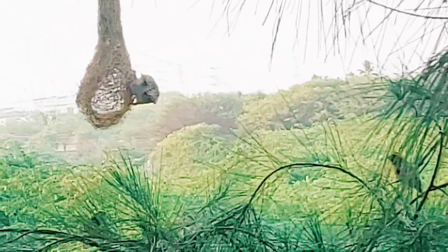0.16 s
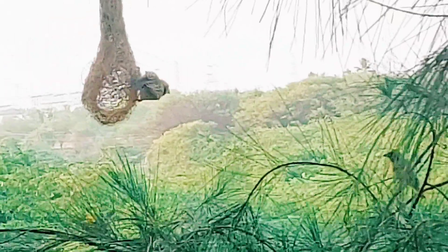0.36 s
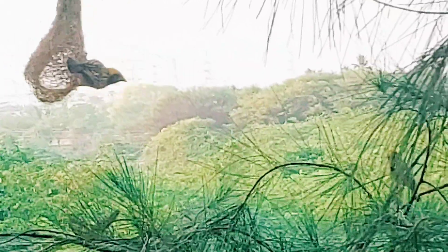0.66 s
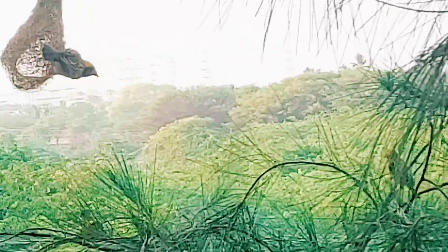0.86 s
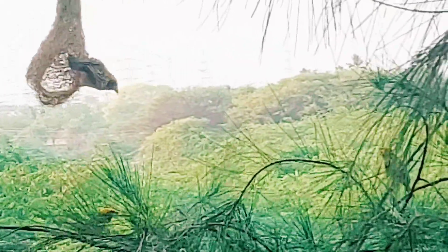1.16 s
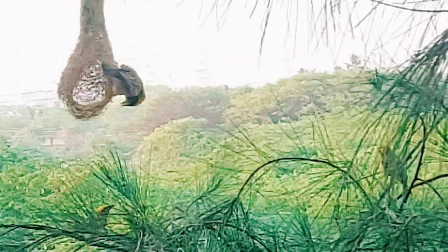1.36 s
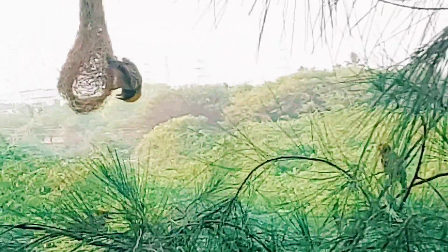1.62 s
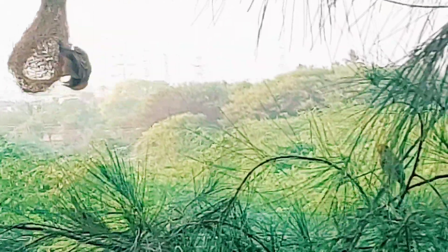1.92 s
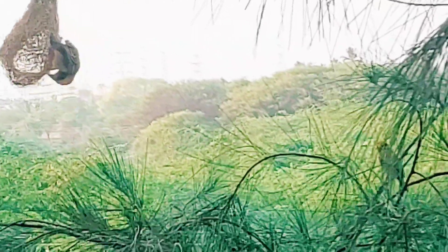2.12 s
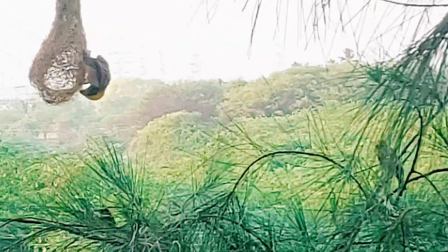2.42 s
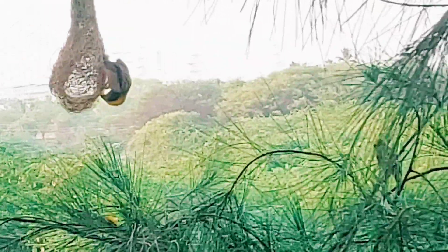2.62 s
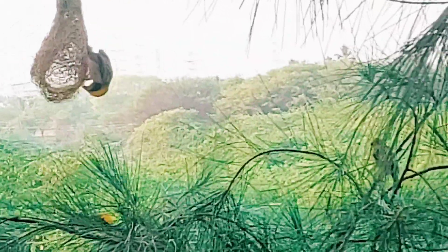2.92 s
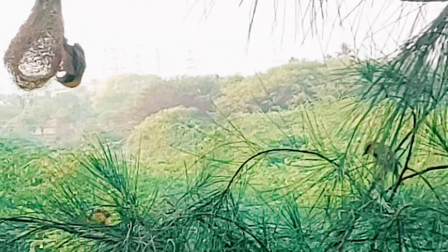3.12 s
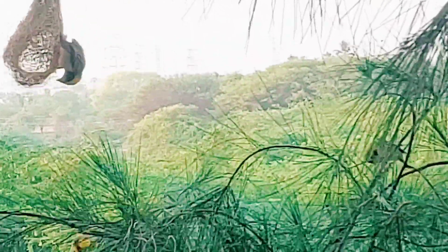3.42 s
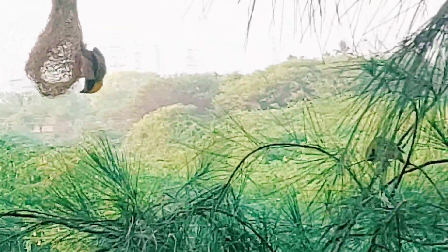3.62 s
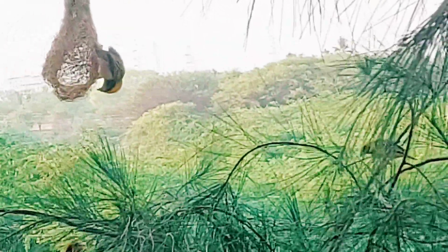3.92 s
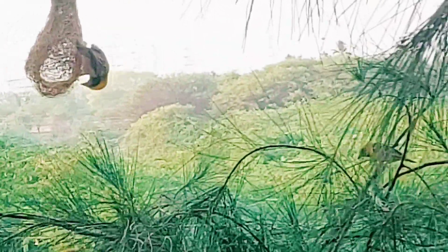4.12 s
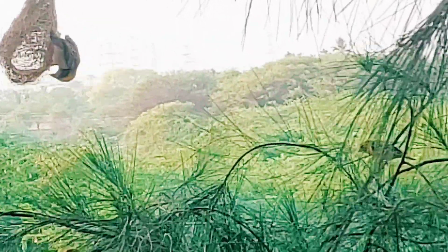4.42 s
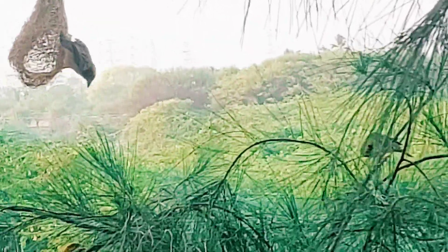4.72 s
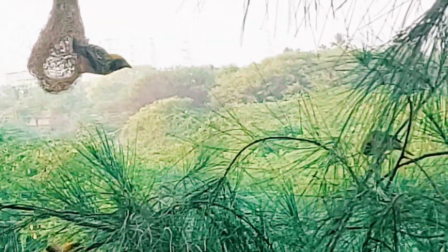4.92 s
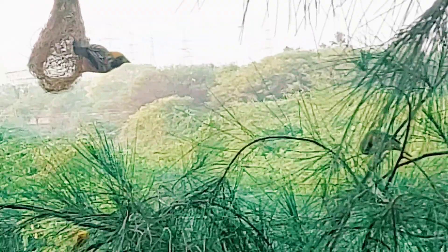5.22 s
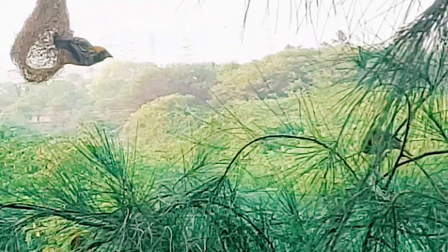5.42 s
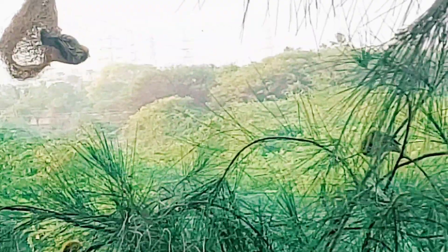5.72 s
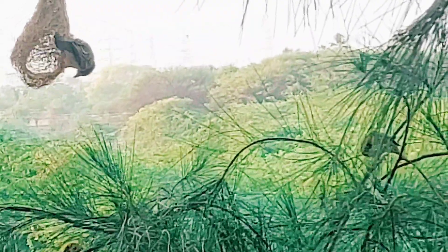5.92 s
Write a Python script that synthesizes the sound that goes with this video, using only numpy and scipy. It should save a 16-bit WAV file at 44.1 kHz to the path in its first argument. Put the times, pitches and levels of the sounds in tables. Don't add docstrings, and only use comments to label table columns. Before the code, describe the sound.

Close weaver birds at a hanging nest chatter in bright, piercing bursts: sliding whistles, rasps and see-saw warbles, then rapid churrs. A long nasal wheeze buzzes through the second and third seconds. A sparser lull follows with brief chirps, then strong churrs and warbles return. More of the flock twitters behind. Leaves give a short soft echo; far traffic and wind rumble low. The handheld phone microphone is slightly overloaded.

```python
import sys
import numpy as np
from scipy import signal
from scipy.fft import rfft, irfft
from scipy.io import wavfile
from scipy.ndimage import uniform_filter1d, map_coordinates

SR = 44100
rng = np.random.default_rng(int(sys.argv[2]) if len(sys.argv) > 2 else 0)


def makeup_ratio(level_db):
    decades = np.asarray(level_db, float) / 20
    return 10 ** decades


def digitize_waveform(pressure):
    field = np.atleast_2d(pressure).T
    bounded = np.clip(field, -1, 1)
    quanta = np.round(bounded * 32767).astype(np.int16)
    wavfile.write(sys.argv[1], SR, quanta)


N = 267246


def sing(put, start, hz, gain, pan_db, lead_ms, rough=.3, waver=0.01006, second_db=-28, third_db=-24):
    n = len(hz)
    right_phase = 2 * np.pi * np.cumsum(hz * (1 + waver * wobble(n, 252.8))) / SR
    left_phase = right_phase + 2 * np.pi * hz * lead_ms / 1000
    gain = gain * (1 + rough * wobble(n, 303.8))

    def tone(phase):
        return np.sin(phase) + makeup_ratio(second_db) * np.sin(2 * phase) + makeup_ratio(third_db) * np.sin(3 * phase)

    put(start, gain * makeup_ratio(pan_db) * tone(left_phase), gain * tone(right_phase))


def wobble(count, hz):
    place = np.arange(count) * hz / SR
    i = place.astype(int)
    knots = rng.standard_normal(i[-1] + 2)
    ease = np.sin(np.pi / 2 * (place - i)) ** 2
    return 1.15 * (knots[i] + ease * (knots[i + 1] - knots[i]))


def follow(table, stretch):
    s, *columns = np.transpose(table)
    t = np.arange(s[0], s[-1], 1 / SR / stretch)
    return [uniform_filter1d(np.interp(t, s, column), size=160) for column in columns]


def fade(count, edge_s):
    i = np.arange(count)
    return np.sin(np.pi / 2 * np.clip(np.minimum(i, count - i) / (edge_s * SR), 0, 1)) ** 2


def add(out, start, left, right):
    i = max(int(start * SR), 0)
    n = max(min(len(left), N - i), 0)
    out[:, i:i + n] += np.array([left[:n], right[:n]])


# t/s, lead/ms
LEAD_MS = [(0, .21), (4.15, .21), (4.19, .25), (4.24, .07), (4.4, .07), (4.45, .1), (5.7, .1), (5.72, 0)]


def lead(s):
    return np.interp(s, *np.transpose(LEAD_MS))


# t/s, f/Hz, level/dB
WARBLE = [(-.029, 3650, -17), (0, 5800, 0), (.027, 3900, 0), (.039, 3830, 1), (.0505, 5650, 1),
          (.063, 3560, -5), (.074, 3620, -5), (.0845, 5580, 1), (.101, 2900, -12)]
# t/s, f/Hz, level/dB
WARBLE_TOP = [(-.034, 4800, -16), (-.014, 6257, -8.5), (.002, 6136, -5), (.022, 5287, -10.5),
              (.036, 5236, -20), (.056, 5400, -5.5), (.1, 5405, -12), (.14, 5430, -33)]
# t/s, level/dB, depth of the pitch dips [ratio], left minus right/dB
WARBLES = [(.686, -19, 0.95, -6.5), (1.764, -16.5, 1.05, -4), (2.262, -19, .85, -2),
           (2.686, -15.5, 1.1, -3), (3.83, -19, 1.07, -2), (4.1, -15.5, 0.99, -4), (4.5, -17, 1.01, 0),
           (4.873, -15.5, 1.02, -3), (5.087, -14.5, 0.97, -4.5), (5.293, -18.5, 0.98, -2.5),
           (5.501, -15.5, 1.06, -5.5)]


def warbles(put):
    crest_hz, lead_ms = 5700, .2
    for s, db, depth, pan_db in WARBLES:
        for shape, deep, rough in ((WARBLE, depth, .22), (WARBLE_TOP, 1, .55)):
            when, hz, swell_db = np.transpose(shape)
            place = np.interp(np.arange(when[0], when[-1], 1 / SR), when, np.arange(len(when)))
            eased = place - .8 * np.sin(2 * np.pi * place) / (2 * np.pi)
            hz = uniform_filter1d(map_coordinates(hz, [eased], order=1), size=90)
            hz = crest_hz + deep * (hz - crest_hz)
            level_db = db + 5 + map_coordinates(swell_db, [place], order=1)
            gain = makeup_ratio(level_db) * fade(len(hz), .005)
            sing(put, s + when[0], hz, gain, pan_db, lead_ms, rough=rough, waver=.02 * rough, second_db=-27)


# t/s, f/Hz, level/dB
PHRASES = [
    [(5.785, 4750, -27), (5.8, 5450, -16.5), (5.815, 5680, -13.5), (5.84, 5500, -10), (5.86, 5714, -10.5),
     (5.895, 5716, -10), (5.92, 5375, -12), (5.945, 5260, -5.5), (5.973, 4820, -17)],
    [(4.245, 5400, -24), (4.255, 6400, -19), (4.27, 5400, -19), (4.288, 4350, -17), (4.302, 4500, -17),
     (4.31, 5950, -12), (4.322, 4300, -24), (4.335, 3550, -26), (4.356, 2600, -28)],
    [(3.679, 5800, -23), (3.687, 4750, -20), (3.699, 5900, -21), (3.705, 5200, -25), (3.712, 5700, -26),
     (3.722, 5400, -30)],
    [(.558, 6500, -20), (.575, 5300, -17), (.59, 4300, -17), (.601, 4150, -15), (.61, 5950, -11),
     (.62, 4400, -15), (.635, 3400, -17), (.652, 3300, -27)],
    [(3.32, 2250, -34), (3.327, 3400, -28), (3.333, 4350, -25), (3.342, 4600, -26), (3.356, 4350, -30)],
    [(3.123, 5050, -28), (3.129, 4300, -23), (3.136, 3450, -19), (3.15, 2850, -29), (3.164, 2650, -32)],
    [(.829, 3720, -18), (.87, 3820, -14), (.905, 4050, -12), (.932, 3900, -13), (.95, 3450, -14),
     (.966, 2650, -20)],
    [(1.18, 4390, -8), (1.19, 4050, -10.5), (1.203, 3700, -6), (1.217, 3340, -12), (1.233, 2595, -17.5)],
    [(1.196, 6150, -24), (1.213, 6550, -22), (1.225, 6120, -14.5), (1.241, 4970, -25)],
]


def phrases(put):
    for shape in PHRASES:
        start = shape[0][0]
        hz, db = follow(shape, 0.99)
        gain = makeup_ratio(db + 4) * fade(len(hz), .003)
        sing(put, start, hz, gain, -7.0, lead(start), rough=.2, waver=.004, third_db=-32)


# t/s, length/s, start f/Hz, end f/Hz, level/dB
SLIDES = [(0, .044, 6400, 5110, -16), (.202, .016, 5610, 4890, -11.5), (.238, .028, 5120, 3820, -10),
          (.626, .02, 7600, 6100, -24), (.652, .054, 3408, 3190, -12), (.97, .016, 5700, 4200, -15),
          (1.14, .014, 5900, 4500, -19), (1.282, .01, 5100, 3250, -21), (1.291, .014, 3250, 2850, -21),
          (1.308, .026, 7000, 4700, -19), (1.409, .026, 4310, 3200, -11), (1.43, .027, 3250, 3180, -19),
          (1.481, .02, 7300, 5110, -15), (1.921, .033, 3470, 2930, -23), (2.21, .1, 3950, 2350, -18),
          (2.405, .025, 7200, 5900, -22), (2.909, .025, 3778, 3300, -12.5), (2.915, .095, 3520, 2410, -30),
          (3.076, .055, 5100, 2620, -36), (3.175, .03, 2600, 2450, -33), (3.165, .042, 2420, 1910, -43),
          (3.364, .016, 6600, 5600, -20), (3.36, .028, 3750, 2820, -30), (3.951, .009, 5400, 4360, -27),
          (4.397, .02, 3950, 3800, -28), (4.415, .014, 4100, 3300, -25), (5.668, .014, 6000, 4800, -19),
          (5.677, .025, 4000, 3450, -20), (5.718, .032, 4800, 3000, -16), (5.883, .1, 4770, 4080, -15.5),
          (6.03, .028, 6300, 4220, -20)]
# t/s, length/s, start f/Hz, end f/Hz, level/dB
DRIFTS = [(0.224, 0.099, 5240, 4870, -12.5), (.29, 0.23, 5027, 3538, -10.5), (0.369, 0.06, 6070, 5770, -23),
          (0.409, 0.15, 5654, 5257, -12.5), (0.387, 0.089, 2934, 2144, -24), (0.428, 0.13, 4514, 4404, -16),
          (0.541, 0.028, 5300, 4860, -17), (.615, 0.034, 5800, 5870, -15.5), (0.7, 0.073, 3200, 3265, -23),
          (3.318, 0.007, 5400, 6600, -32), (3.351, 0.011, 5340, 6900, -25), (0.509, 0.062, 3640, 3560, -31),
          (3.737, 0.1, 2730, 2400, -34), (3.962, 0.024, 4420, 5650, -23.5), (4.228, 0.037, 6200, 7400, -24),
          (5.705, 0.022, 4690, 4800, -8.5), (5.733, 0.077, 4127, 3625, -13.5),
          (5.909, .045, 3906, 2805, -23.5), (5.968, 0.0305, 5070, 5240, -19),
          (5.996, 0.026, 4900, 5150, -22), (0.803, 0.038, 3700, 2440, -22),
          (1.063, 0.027, 3870, 3154, -8.5), (4.497, 0.027, 3563, 2962, -12), (4.63, 0.017, 3646, 2900, -19),
          (4.756, .022, 3533, 3010, -12), (4.881, 0.022, 3585, 3013, -10),
          (5.012, 0.024, 3540, 2940, -14.5)]
# t/s, length/s, middle f/Hz, end f/Hz, level/dB
HOOKS = [
    (0.029, 0.035, 6250, 5680, -11),
    (0.217, 0.037, 6395, 5820, -20.5),
    (0.272, 0.046, 6520, 5780, -15.5),
    (0.543, 0.071, 6485, 5070, -14.5),
    (0.953, 0.066, 6000, 4700, -34),
    (2.69, .07, 6800, 5600, -26),
    (5.234, 0.04, 8470, 7020, -31),
    (3.532, 0.011, 3900, 3750, -45),
]
# t/s, length/s, start f/Hz, top f/Hz, level/dB
RISES = [
    (1.324, .092, 4725, 5150, -19),
    (3.337, .014, 4900, 5800, -25),
    (3.584, .04, 4250, 4700, -36),
    (3.654, .024, 4840, 6750, -29),
    (3.653, .036, 2570, 3500, -28),
    (3.93, .032, 2480, 3300, -23.5),
]
# t/s, length/s, f/Hz, level/dB
HELD = [
    (1.327, 0.089, 3670, -18),
    (1.405, 0.071, 3650, -17.5),
    (1.458, .125, 3590, -14.5),
    (1.565, .145, 3605, -14),
    (2.67, 0.027, 5890, -14),
    (2.14, 0.042, 2450, -32),
    (2.415, 0.31, 4880, -30),
    (2.448, 0.26, 2770, -34.5),
    (4.19, 0.063, 3070, -28),
    (5.234, 0.029, 4280, -18),
]


def glides(put):
    notes = []
    for s, length, a, e, db in SLIDES:
        notes.append((s, length, a, e + .35 * (a - e), e, db))
    for s, length, a, e, db in DRIFTS:
        notes.append((s, length, a, (a + e) / 2, e, db))
    for s, length, m, e, db in HOOKS:
        notes.append((s, length, .95 * m, m, e, db))
    for s, length, a, m, db in RISES:
        notes.append((s, length, a, m, m - .4 * (m - a), db))
    for s, length, m, db in HELD:
        notes.append((s, length, .99 * m, m, .99 * m, db))
    for s, length, a, m, e, db in notes:
        n = int(length * SR)
        gain = makeup_ratio(db + 3.5) * fade(n, .004 + .12 * length)
        pan_side, lead_side = rng.standard_normal(2)
        pan_db, lead_ms = -6.5 + 1.5 * pan_side, lead(s) + .01 * lead_side
        rough, waver = (.15, .002) if a == e else (.35, .007)
        sing(put, s, bend(n, a, m, e), gain, pan_db, lead_ms, rough=rough, waver=waver, third_db=-32)


def bend(count, start_hz, mid_hz, end_hz):
    v = np.linspace(0, 1, count)
    return start_hz * (1 - v) * (1 - 2 * v) + 4 * mid_hz * v * (1 - v) + end_hz * v * (2 * v - 1)


# t/s, f/Hz, trill swing f/Hz, level/dB, upper f/Hz, upper level/dB
CHURR = [(-.118, 4300, 893, -9, 5600, -14), (-.095, 4292, 900, -3, 5553, -4),
         (-.06, 4140, 605.5, 0.5, 5410, 4), (-.036, 3950, 124, -3, 5098, -2),
         (-.028, 3650, 30, -2, 4800, 1.5), (-.012, 3192, 28, -4, 4420, -28),
         (0, 2850, 11.3, -10.5, 4400, -40)]
# end t/s, level/dB, stretch [ratio], pitch [ratio], left minus right/dB
CHURRS = [(.84, -11, 0.92, 0.91, -0.5), (.966, -10, 0.84, 1.07, 4.5), (1.09, -10.5, 1.25, 1.023, 4),
          (1.232, -11, 1, 1.025, 3), (1.44, -12, 1.24, 0.93, -5), (1.598, -33, 1.4, 1, 2),
          (1.732, -12, 0.77, 1.01, -25), (4.53, -7, 0.89, 0.95, -8.5), (4.657, -4, 1.16, 1.012, -5),
          (4.781, -3.5, 1.1, 1.007, -9), (4.905, -4, 1.01, 1.083, -6), (5.037, -6.5, 1.16, 1.035, -10.5),
          (5.715, -17, 0.68, 1.006, -15), (5.945, -24.5, 1.14, 0.8, -4)]


def churrs(put):
    trill_hz = 82.36
    for end, db, stretch, ratio, pan_db in CHURRS:
        hz, swing, low_db, top_hz, top_db = follow(CHURR, stretch)
        n = len(hz)
        start = end - n / SR
        cycle = (np.cumsum(1 + .38 * wobble(n, 65))[::-1] * trill_hz / SR) % 1
        saw = uniform_filter1d(2 * cycle ** 1.4 - 1, size=50)
        chip = 1 - np.clip(swing / 900, 0, 1) * (1 - np.sin(np.pi * cycle))
        low_gain = makeup_ratio(db + low_db) * chip * fade(n, 0.00055)
        sing(put, start, ratio * (hz + swing * saw), low_gain, pan_db, 0.094, rough=0.11)
        top_gain = makeup_ratio(db + top_db) * chip
        sing(put, start, ratio * (top_hz + .5 * swing * saw), top_gain, pan_db - 14.5, 0.25, rough=0.28)


# t/s, length/s, start f/Hz, end f/Hz, level/dB
BURRS = [(0.898, .045, 5304, 5300, -16), (.95, 0.089, 3981, 3850, -10), (1.03, 0.038, 5200, 5240, -13),
         (1.088, .095, 3638, 4210, -11.5), (1.16, 0.031, 5200, 5400, -13.5),
         (2.35, 0.21, 3610, 3256, -23.5), (2.364, .03, 6980, 7230, -24), (3.133, 0.04, 4150, 3930, -21.5),
         (3.351, .04, 3600, 3200, -28.5), (3.368, 0.0476, 5850, 5750, -27.5),
         (3.676, 0.04, 2600, 2530, -29), (4.34, 0.059, 2550, 2800, -26), (4.304, 0.039, 5700, 5700, -19)]


def burrs(put):
    burr_hz, pitch_swing = 60, .018
    for s, length, a, e, db in BURRS:
        n = int(length * SR)
        grain = .8 * np.clip(wobble(n, 2 * burr_hz) + .9, .35, 1.5)
        hz = np.linspace(a, e, n) * (1 + pitch_swing * wobble(n, burr_hz))
        gain = makeup_ratio(db + 4) * grain * fade(n, .005)
        sing(put, s, hz, gain, -4.5, lead(s), rough=.3, waver=.008)


# t/s, length/s, centre f/Hz, width f/Hz, level/dB
RASPS = [(0.067, 0.48, 4410, 1620, -14.5), (0.952, 0.13, 4530, 2000, -10.5),
         (1.339, 0.22, 4250, 1920, -13.5), (1.518, 0.53, 4250, 2000, -18),
         (2.331, 0.075, 6800, 1500, -17.5), (5.367, 0.058, 2860, 700, -28.5),
         (3.128, 0.057, 3820, 1300, -20), (3.348, 0.059, 4430, 2980, -22.5), (3.657, 0.08, 3800, 2430, -22),
         (3.919, 0.17, 3540, 2135, -23), (4.134, 0.083, 3020, 1200, -19), (4.333, 0.15, 2800, 1000, -23.5),
         (5.633, 0.092, 3740, 2783, -21), (6.044, 0.015, 4430, 3900, -13.5)]


def rasps(put):
    for s, length, hz, width, db in RASPS:
        n = int(length * SR)
        breath = 0.08 * rng.standard_normal(n)
        x = ring(pulses(np.full(n, 600.), .5, 1.7) + breath, hz, width)
        x = x / x.std() * makeup_ratio(db) * fade(n, 0.0079) * np.exp(-1.2 * np.arange(n) / n)
        put(s, makeup_ratio(-10.5) * np.roll(x, -8), x)


def pulses(hz, jitter, scatter_db):
    n = len(hz)
    cycle = np.cumsum(hz * (1 + jitter * wobble(n, 199.6))) / SR
    return np.diff(np.floor(cycle), prepend=0) * makeup_ratio(scatter_db * rng.standard_normal(n))


def ring(x, hz, width):
    edges = [max(hz - width / 2, 50), hz + width / 2]
    return signal.sosfilt(signal.butter(2, edges, "band", fs=SR, output="sos"), x)


# t/s, pulse rate f/Hz, level/dB
BUZZ = [(1.72, 225.9, -5.5), (1.8, 228.2, -18), (2.0, 228.1, -9), (2.25, 239.8, -8.5), (2.5, 242.4, -12.5),
        (2.75, 246.9, -9), (2.89, 245.2, -13), (2.92, 243, -13.5)]
# f/Hz, width f/Hz, level/dB, left minus right/dB
BUZZ_THROAT = [(2000, 620, -42, 10.5), (2445, 225, -41, 16), (3280, 740, -15.5, -6.5),
               (4250, 450, -2.5, -11.5), (4800, 133, -6, -18), (5420, 360, 1.5, -10.5),
               (6600, 2500, -32, 4)]


def buzz(put):
    hz, db = follow(BUZZ, 0.99)
    n = len(hz)
    turn = np.pi * np.cumsum(hz * (1 + .007 * wobble(n, 40))) / SR
    comb = np.zeros(n)
    for k in range(14, 64):
        strength = makeup_ratio(-3 * (k % 2)) * (1 + .4 * wobble(n, 69.94))
        comb += strength * np.cos(k * turn + .4 * wobble(n, 45))
    throat = np.zeros((2, n))
    for f, width, level_db, pan_db in BUZZ_THROAT:
        sides = makeup_ratio(level_db + np.array([[pan_db], [0]]))
        throat += sides * ring(comb, f, width) / np.sqrt(width)
    left, right = throat / throat[1].std() * makeup_ratio(db)
    put(BUZZ[0][0], np.roll(left, -11), right)


# t/s, centre f/Hz
CROWD_HZ = [(0, 4606), (1.7, 4587), (3.0, 4530), (3.8, 4953), (4.4, 4942), (4.5, 4604), (5.04, 4587),
            (5.1, 5103), (5.6, 5110), (5.7, 4403), (6.06, 4690)]


def flock():
    centre_hz = np.interp(np.arange(N) / SR, *np.transpose(CROWD_HZ))
    low = makeup_ratio(bouts(0)) * crowd(centre_hz, .2, -5.0, count=10)
    thin_db = -22.5 + .65 * bouts(.015) + 1.8 * wobble(N, 9.7)
    thin = makeup_ratio(thin_db) * crowd(7200, 0.084, 24, count=4)
    return makeup_ratio(-7.0) * (low + thin)


def crowd(centre_hz, spread, pan_db, count):
    out = np.zeros((2, N))
    for early in rng.integers(2, 14, count):
        slide = spread * np.tanh(wobble(N, 50.46)) + .05 * wobble(N, 707.6)
        turn = 2 * np.pi * np.cumsum(centre_hz * np.exp(slide)) / SR
        chips = np.clip(wobble(N, 68.86) + 0.33, 0, 2)
        x = chips * (np.sin(turn) + makeup_ratio(-21.0) * np.sin(2 * turn))
        out += [makeup_ratio(pan_db) * np.roll(x, -early), x]
    return out / out.std()


# t/s, length/s, level/dB
BOUTS = [(-.05, 0.43, -13), (0.275, 0.34, -10.5), (0.709, 0.5, -7.5), (1.332, 0.54, -10.5),
         (1.76, 0.89, -16), (2.671, 0.2, -11.5), (3.136, 0.0077, -24.5), (3.358, 0.0086, -22.5),
         (3.651, 0.022, -23), (3.85, 0.11, -18), (4.114, 0.082, -11.5), (4.298, 0.037, -14),
         (4.49, 0.51, -11), (5.096, 0.06, -12.5), (5.266, 0.11, -13), (5.517, 0.084, -18),
         (5.682, 0.27, -10), (5.876, 0.043, -6.5), (6.05, .05, -16)]


def bouts(early_s):
    join_db_per_s, drop_db_per_s, lull_db = 343, 246, -51
    t = np.arange(N) / SR + early_s
    level_db = np.full(N, float(lull_db))
    for s, length, db in BOUTS:
        joining = join_db_per_s * np.maximum(s - t, 0)
        leaving = drop_db_per_s * np.maximum(t - s - length, 0)
        level_db = np.maximum(level_db, db - joining - leaving)
    return level_db


def trees(x):
    t60_s, tail_db, wall_s, wall_db = .4, -10, .021, -10.5
    t = np.arange(int(.5 * SR)) / SR
    tail = rng.standard_normal((2, len(t))) * makeup_ratio(-60 * t / t60_s) * np.clip(t / 0.0039, 0, 1)
    tail *= makeup_ratio(tail_db) / np.sqrt(np.sum(tail ** 2, axis=1, keepdims=True))
    tail[1, int(wall_s * SR)] += makeup_ratio(wall_db)
    return x + signal.fftconvolve(x, tail, axes=1)[:, :N]


# f/Hz, level/dB (per Hz)
RUMBLE = [(20, -7.5), (40, -15), (62, 0), (85, -3.5), (112, 2), (150, -8.5), (182, -3.5), (230, -4),
          (400, -5.5), (800, -11.5), (1600, -14), (4000, -4.5), (7000, -27), (16000, -35)]
# t/s, level/dB
RUMBLE_SWELL = [(0, -46), (1.0, -43.5), (2.0, -44), (2.95, -41), (3.2, -45), (4.35, -40.5), (4.6, -42),
                (5.5, -42), (6.06, -42)]
# f/Hz, level/dB (relative to the rumble)
HUM = [(62, -13), (182, -17)]


def rumble():
    hz, db = np.transpose(RUMBLE)
    f = np.arange(N // 2 + 1) * SR / N + 1
    colour = makeup_ratio(np.interp(np.log(f), np.log(hz), db))
    common, own = rng.standard_normal(N), rng.standard_normal((2, N))
    share = np.clip(.75 - f / 2500, 0, 1)
    noise = irfft(colour * (share * rfft(common) + np.sqrt(1 - share ** 2) * rfft(own)), N)
    hum = np.zeros(N)
    for hum_hz, hum_db in HUM:
        turn = 2 * np.pi * np.cumsum(hum_hz * (1 + .07 * wobble(N, 14))) / SR
        hum += makeup_ratio(hum_db + 3 * wobble(N, 9)) * np.sin(turn)
    swell_db = np.interp(np.arange(N) / SR, *np.transpose(RUMBLE_SWELL)) + 1.3 * wobble(N, 5)
    return (noise / noise.std() + hum) * makeup_ratio(swell_db + 1.5 + np.array([[-4], [4]]))


def scene():
    near = np.zeros((2, N))
    for voice in (warbles, phrases, glides, churrs, burrs, rasps, buzz):
        voice(lambda *sound: add(near, *sound))
    return trees(near + flock()) + rumble()


def roll_off(x):
    return signal.sosfilt(signal.butter(12, 16890, fs=SR, output="sos"), x)


def record(dry):
    dip = .45 * ring(dry[0], 8800, 1800)
    peaks = .9 * ring(dry[0], 11200, 2400) + .6 * ring(dry[0], 14000, 3200)
    left = dry[0] - dip + peaks
    x = np.clip(1.701 * np.array([makeup_ratio(-0.35) * left, dry[1]]), -1.15, 1.15)
    x = x - 0.29 * x ** 3 + 0.016 * x ** 2
    top_cut = signal.ellip(10, .2, 60, 15900, fs=SR, output="sos")
    x = signal.sosfilt(top_cut, x - x.mean())
    return roll_off(np.clip(1.12 * x, -1, 1))


dry = scene()
out = record(dry)
digitize_waveform(out)
```